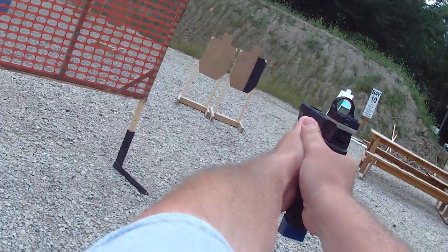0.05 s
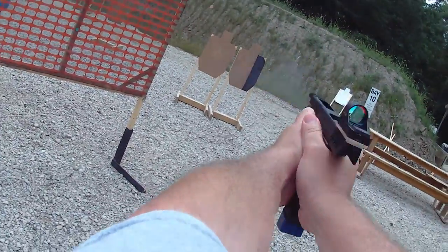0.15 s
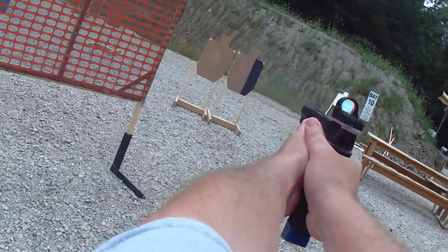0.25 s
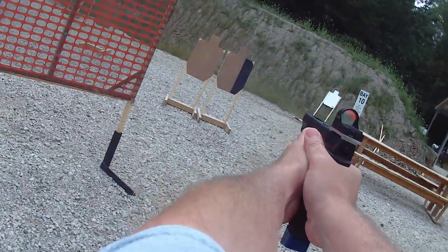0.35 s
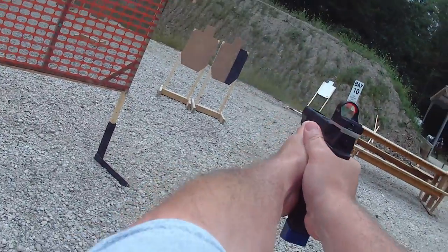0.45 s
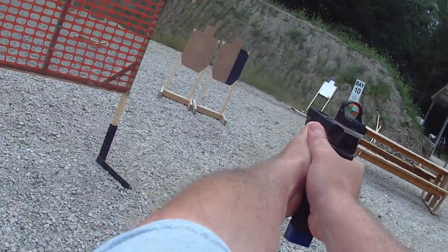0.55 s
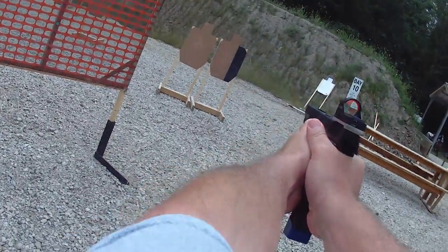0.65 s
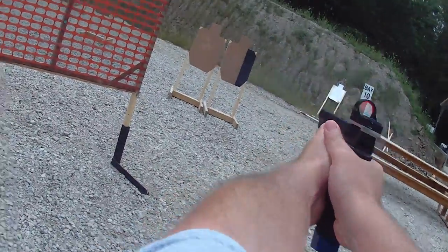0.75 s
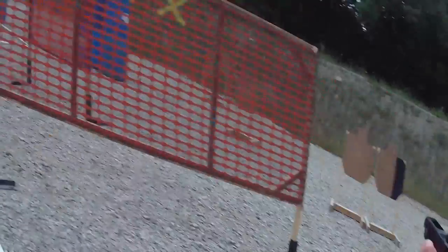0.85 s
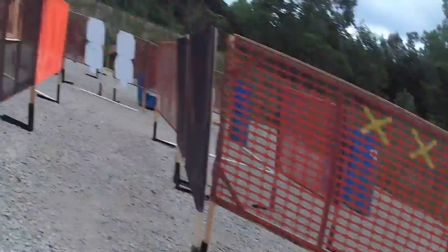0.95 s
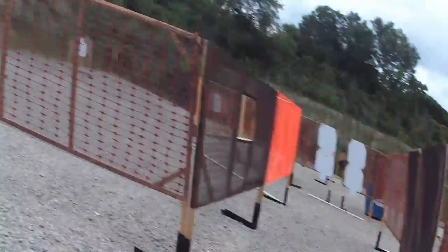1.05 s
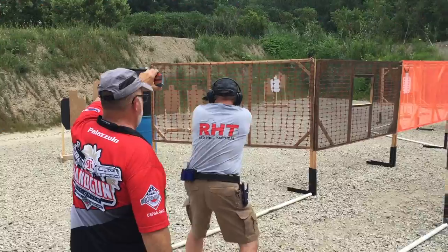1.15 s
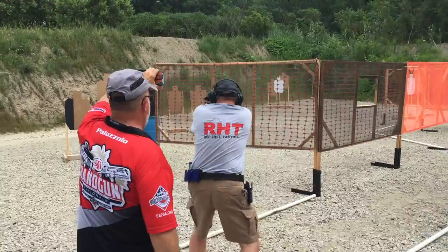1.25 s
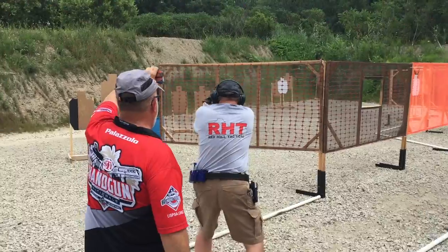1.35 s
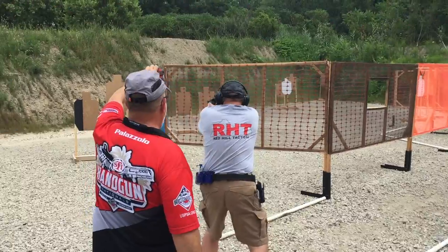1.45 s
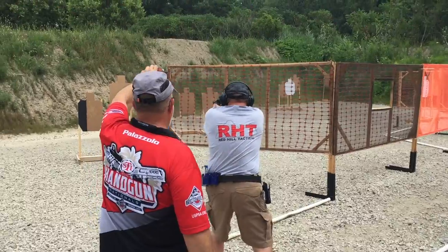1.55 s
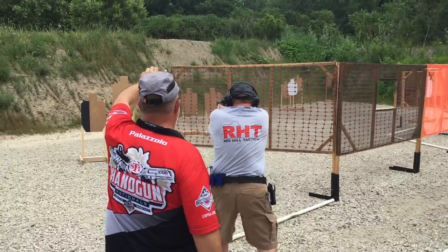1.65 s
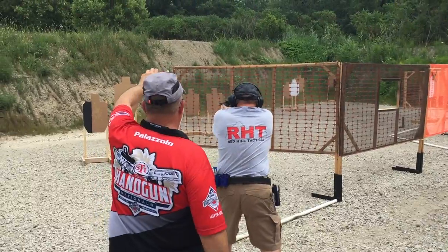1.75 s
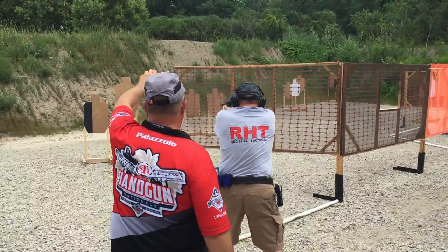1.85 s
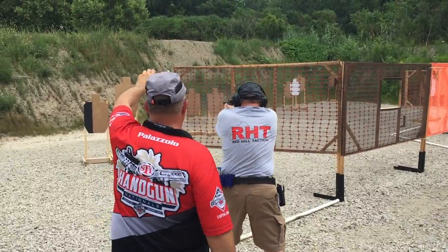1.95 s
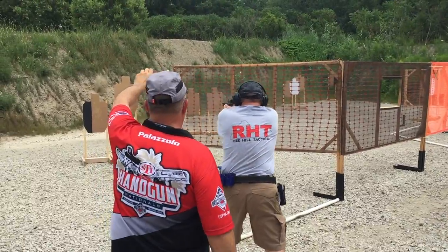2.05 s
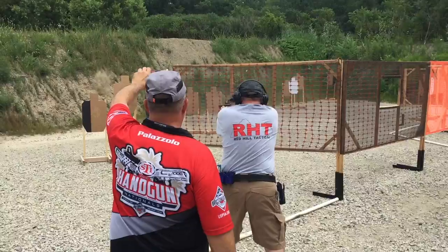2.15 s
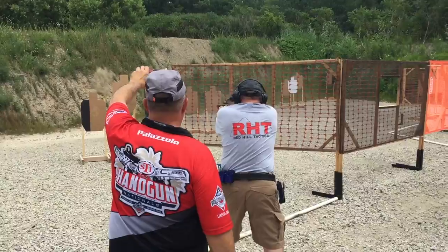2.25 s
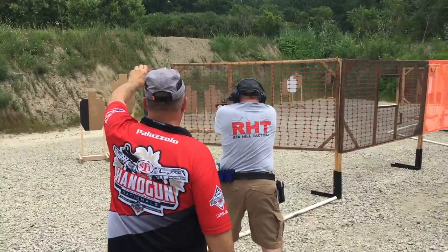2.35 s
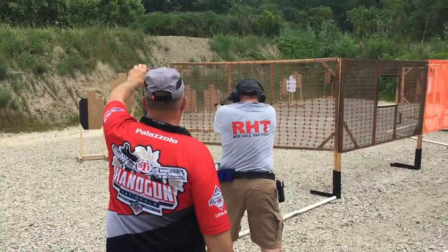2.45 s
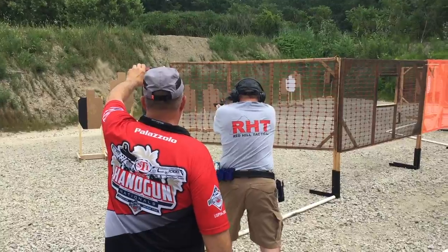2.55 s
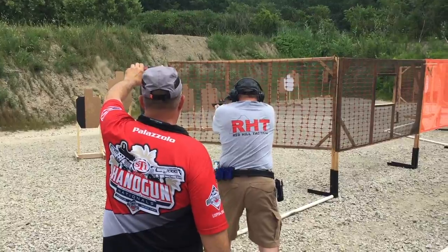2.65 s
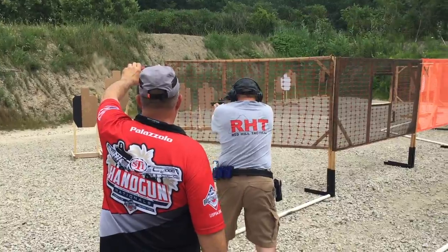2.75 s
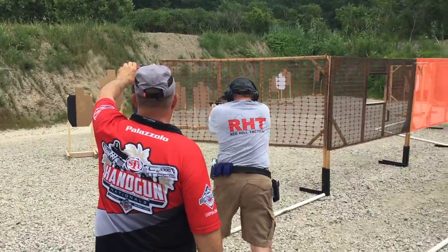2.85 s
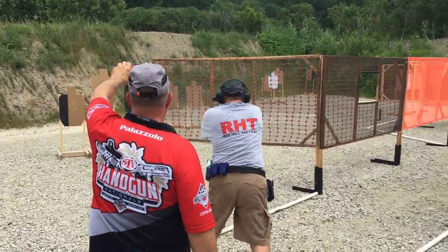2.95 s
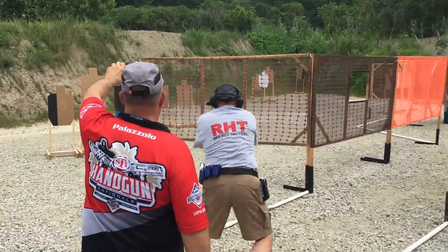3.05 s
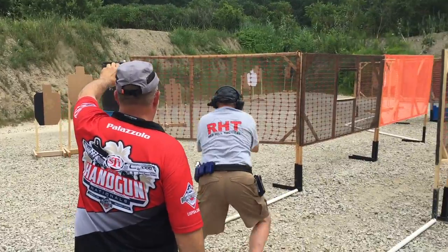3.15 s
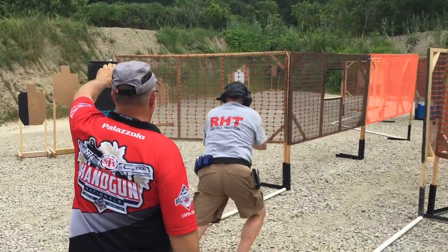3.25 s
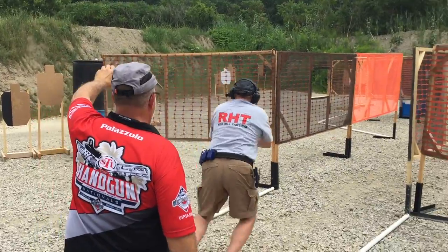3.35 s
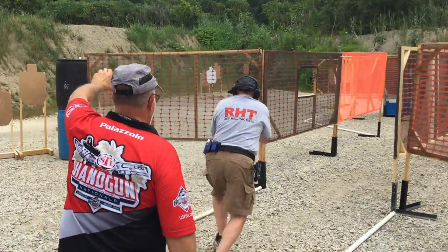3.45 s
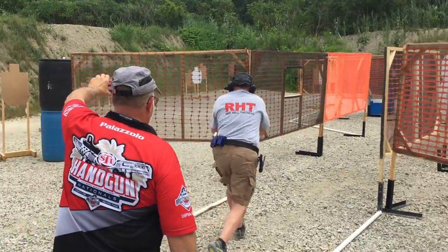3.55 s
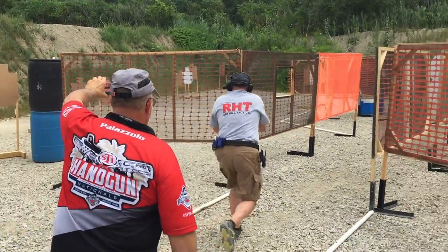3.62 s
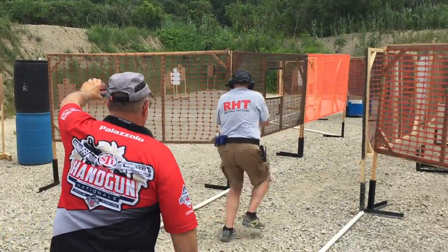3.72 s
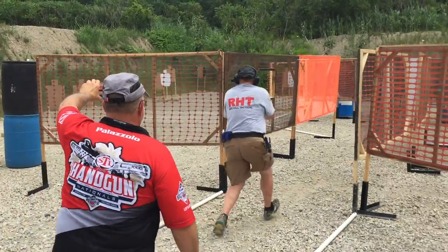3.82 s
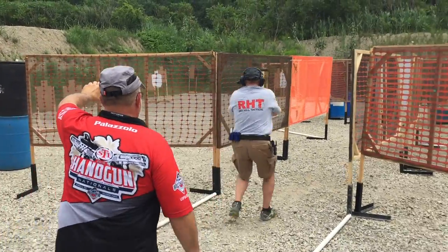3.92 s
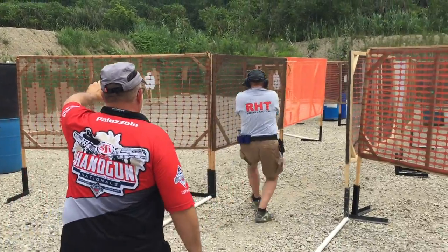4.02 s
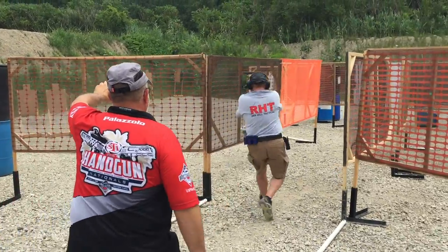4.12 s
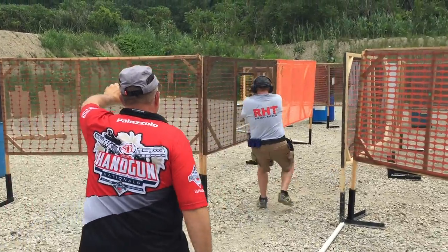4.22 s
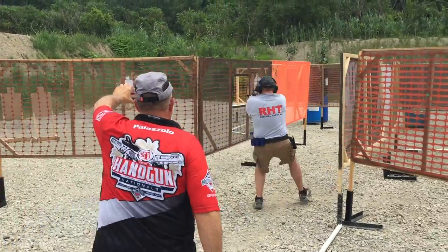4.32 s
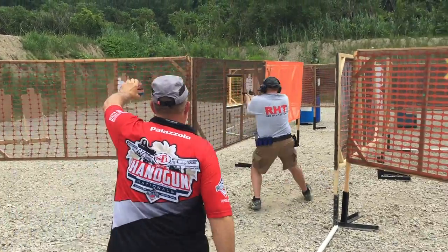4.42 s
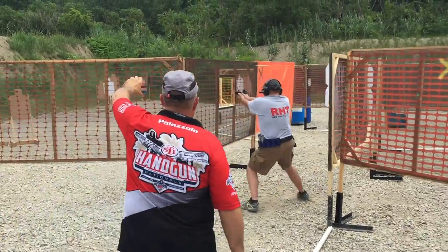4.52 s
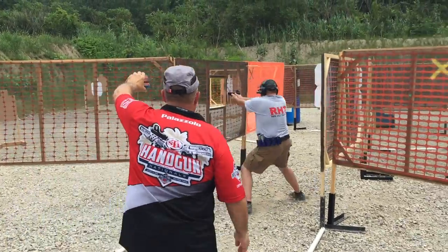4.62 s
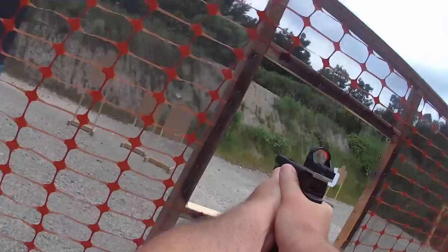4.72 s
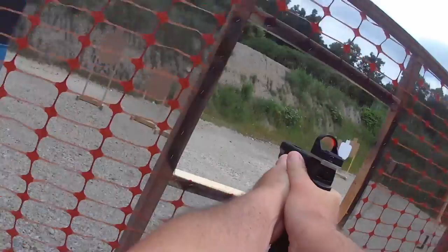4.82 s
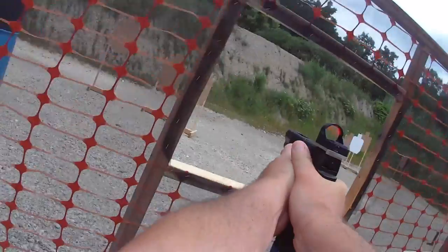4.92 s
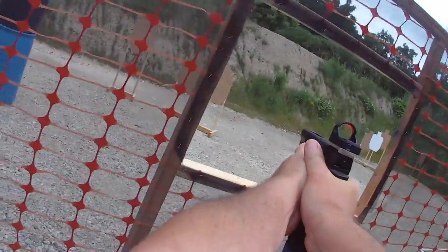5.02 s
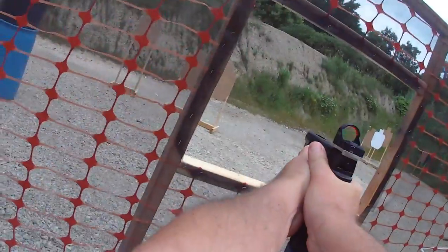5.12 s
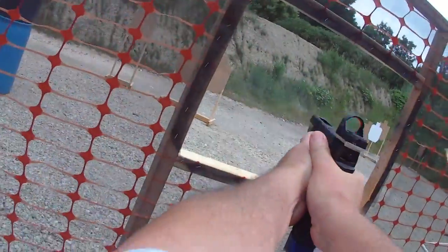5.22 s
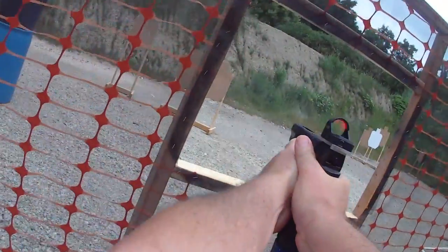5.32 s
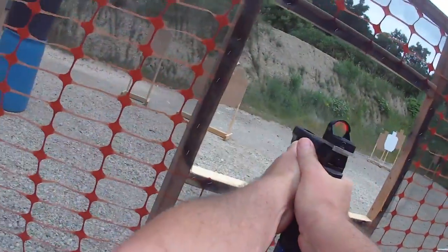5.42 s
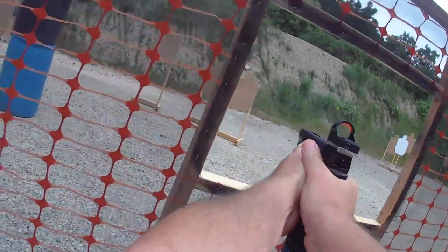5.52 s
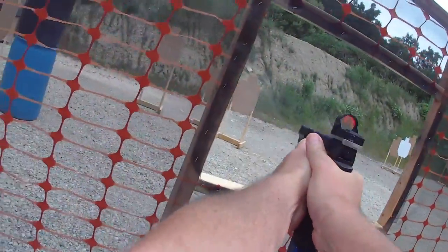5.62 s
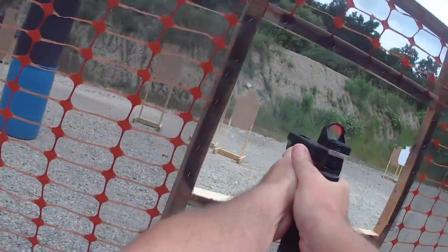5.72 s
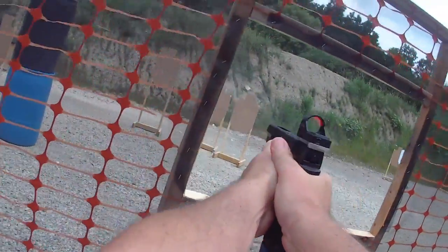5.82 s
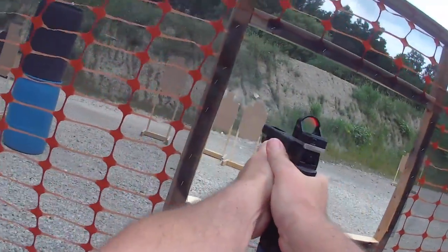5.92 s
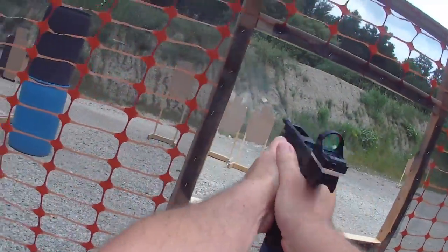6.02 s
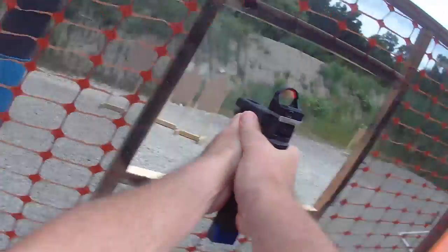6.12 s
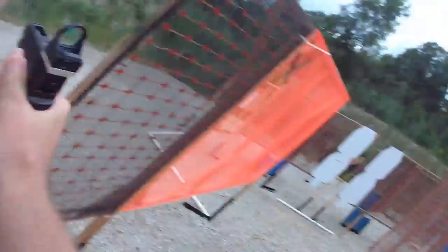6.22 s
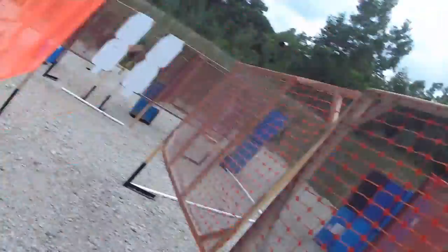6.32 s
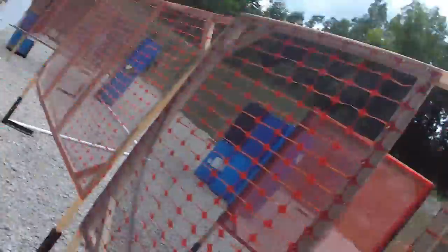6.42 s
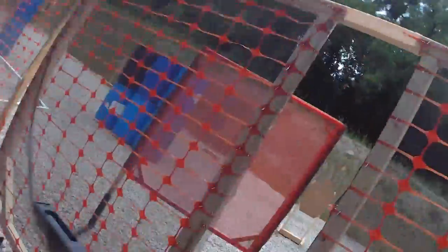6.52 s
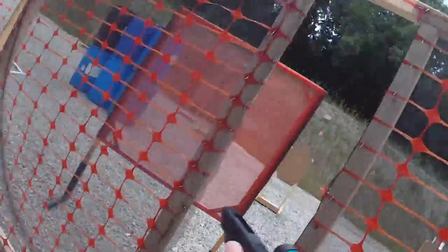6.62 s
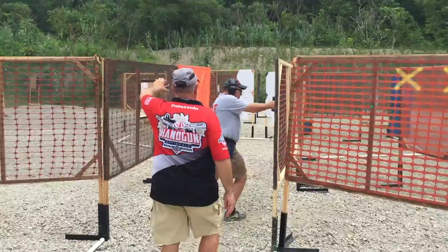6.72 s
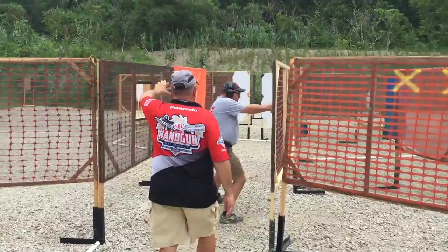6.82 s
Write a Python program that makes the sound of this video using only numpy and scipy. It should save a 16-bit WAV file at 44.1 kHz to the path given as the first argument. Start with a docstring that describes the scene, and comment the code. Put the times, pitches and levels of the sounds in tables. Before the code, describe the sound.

Outdoors in a gravel bay below a wooded hill, quiet air carries the fading echo of an earlier shot. At 0.14 and 0.66 seconds two close pistol shots crack, each overloading the microphone, with hard slaps, a short bay tail and a longer hill echo; a bullet knocks at 0.75. A spent case rings very high at 1.54, again fainter at 1.75. Heavier, boomier shots hit at 1.97 and 2.77, each followed by a dry knock. From 3.25 to 4.7 faint gravel scuffs accompany movement, and two softer shots, a pop and low thump heard from metres behind, come at 3.75 and 4.13 with rolling echoes. Small stone knocks and crunches follow around 4.6 to 5.0. Three close blasts at 5.19, 5.56 and 6.02 slap off surfaces; a bright knock follows at 6.09. The sound dips after blasts and recovers; brass tinkles at 6.81 in the decaying echo.

```python
"""Pistol pairs in a gravel bay

Seven close shots, heard at the shooter's head, are noise bursts that overload the microphone; slaps from walls
and ground, a bay tail and a long wooded-hill echo follow. Two more, a pop and thump, are heard from some metres
behind the shooter. Bullets and stones knock as resonant noise, spent cases ring as paired sines, and gravel
crunches in noise grains."""
import sys
import numpy as np
from scipy import signal
from scipy.fft import rfft, irfft
from scipy.io import wavfile
from scipy.ndimage import uniform_filter1d

SR = 44100
rng = np.random.default_rng(int(sys.argv[2]) if len(sys.argv) > 2 else 0)


def transcribe(signal):
    """Save signal, clipped to [-1, 1], as a 16-bit WAV file at the path in sys.argv[1]."""
    frames = np.atleast_2d(signal).T
    limited = np.clip(frames, -1, 1)
    pcm = np.round(limited * 32767).astype(np.int16)
    wavfile.write(sys.argv[1], SR, pcm)


N = 302967  # samples

# Spectrum of a soft body thud, under a close report and under a foot. Each row: frequency in Hz, level in dB.
BODY_COLOUR = [(20, -26), (55, -4), (110, 2.5), (160, -1.5), (230, 0), (380, -9.5), (1000, -44),
               (3000, -73.5)]
# Spectrum of the hill's answer, heard from behind the shooter. Each row: frequency in Hz, level in dB.
FAR_HILL_COLOUR = [(24, -52), (50, -16.5), (100, -12), (160, -27), (330, -9.5), (460, -13.5), (560, -1.5),
                   (700, -0.5), (900, -7), (1200, -5), (3000, -9), (4200, -13), (5500, -19.5),
                   (8500, -24.5), (16000, -46)]


def close_shots():
    """After a short reversed burst each report cracks, booms, slaps off surfaces, rings in the bay and echoes."""
    # Shots at the shooter's head. Each row: start in seconds, stance, then levels in dB of the blast, slaps,
    # shove, body, bay tail, reversed burst and hill echo. Surfaces below offset the slaps and shove.
    shots = [(0.1389, "open", 8.5, 3, -5, -15, -19, -2.5, -46),
             (0.6615, "open", -1, 2, -16.5, -33, -17.5, -13, -45),
             (1.9708, "fence", 9, 2.5, 0.5, -3, -13, -7.5, -46),
             (2.7747, "fence", 2, -1, -10, -9.5, -16.5, -16.5, -47),
             (5.1878, "window", 4.5, 6, 0, -8, -13.5, -4.5, -44),
             (5.5571, "window", -2.5, -1, -8, -15.5, -19.5, -20.5, -42.5),
             (6.0226, "window", -2, -1, -16.5, -18.5, -18.5, -21.5, -43.5)]
    # Walls and ground near each stance. Each row: delay in seconds, slap offset in dB, shove offset in dB.
    surfaces = {"open": [(0.012, -17, 0.5), (0.025, -11.5, -12), (0.062, -21.5, -39)],
                "fence": [(0.011, -8, 0.5), (0.028, -7.5, -2.5), (0.0505, -8.5, -9.5)],
                "window": [(0.0155, -18.5, -2), (0.0372, -6, -1.5)]}
    # The hill from each stance: round trip in seconds, factor on the echo's ring-down times.
    hill_from = {"open": (0.19, 0.75), "fence": (0.25, 0.85), "window": (0.25, 0.83)}
    # Spectra of the direct blast, slap, reversed burst, bay tail and hill echo.
    # Each row: frequency in Hz, level in dB.
    blast_colour = [(30, -31.5), (130, -3), (250, 3), (400, -13.5), (540, 6.5), (900, 0.5), (1500, -10),
                    (3000, -11.5), (5000, -15), (9000, -19), (16000, -26)]
    slap_colour = [(30, -28.5), (150, -7), (350, -9.5), (550, 8.5), (1000, -0.5), (1400, -4), (2800, -10),
                   (5000, -16.5), (7000, -17), (10000, -24.5), (16000, -28)]
    reversed_colour = [(40, -6), (250, -7.5), (550, -5), (900, -3.5), (1400, -38), (3000, -29),
                       (4500, -58.5), (9000, -76)]
    bay_colour = [(30, -16.5), (120, -6.5), (330, -4.5), (600, -2.5), (1200, 1.5), (2500, -3), (4500, -11),
                  (7000, -15), (10000, -19.5), (16000, -22.5)]
    hill_colour = [(24, -71.5), (100, -25), (180, -27.5), (340, -10.5), (580, -6), (1000, -2.5), (1600, -4),
                   (2700, -2.5), (4000, -8), (8800, -19.5), (16000, -28)]
    # Ring-down of the bay, and of the hill before the stance's factor. Each row: frequency in Hz, t60 in seconds.
    bay_t60 = [(60, 0.42), (500, 0.29), (2500, 0.33), (6000, 0.42), (15000, 0.36)]
    hill_t60 = [(60, 1.7), (600, 8.3), (2500, 3.1), (6000, 2.11), (14000, 0.76)]
    # the click's level is relative to the reversed burst
    click_lead_s, click_db, click_hz, click_t60_s = 0.02, -27, 2230, 0.07
    shove_lag_s, shove_hz, shove_t60_s = 0.0038, 61.8, 0.06

    out = np.zeros(N)
    for s, stance, blast_db, slaps_db, shove_db, body_db, tail_db, reversed_db, echo_db in shots:
        # the action clicks just ahead of the report
        click = knock(reversed_db + click_db, click_hz, click_t60_s)
        add(out, s - click_lead_s, click)

        # a short reversed noise burst ends where the report starts
        reversed_burst = burst(reversed_colour, reversed_db, t60=0.037, size=2048)[::-1]
        reversed_burst = low_cut(reversed_burst, hz=149)
        add(out, s - len(reversed_burst) / SR, reversed_burst)

        add(out, s, shocks(blast_colour, blast_db, t60=0.037))
        add(out, s + 0.006, burst(BODY_COLOUR, body_db, t60=0.16))

        # each reflected front also shoves the microphone into a low swing
        for delay, slap_db, push_db in surfaces[stance]:
            add(out, s + delay, shocks(slap_colour, slaps_db + slap_db, t60=0.044))
            shove = swing(shove_db + push_db, shove_hz, shove_t60_s)
            add(out, s + delay + shove_lag_s, shove)

        bay = scatter(bay_colour, bay_t60, patchy_db=2.5, flutter_db=1.0, frames=60)
        add(out, s, amp(tail_db) * low_cut(bay, hz=120))

        round_trip, length = hill_from[stance]
        echo = hill_echo(hill_colour, hill_t60, round_trip, spread=0.026, early_db=-9, length=length)
        add(out, s, amp(echo_db) * echo)
    return out


def far_shots():
    """From behind, a shot is a short noise pop and a low thump, followed by a broad rolling echo."""
    # Shots heard from some metres behind the shooter. Each row: start in seconds, then levels in dB of the
    # crack, thump, bay tail and hill echo. The thump's level is that of the swing before its weighted copies.
    shots = [(3.746, -27.5, -13, -37.5, -26.5), (4.1336, -23, -14, -35, -26)]
    # Spectra of the crack and of the bay tail. Each row: frequency in Hz, level in dB.
    crack_colour = [(30, -28), (200, -16), (700, 4), (1500, -8.5), (3200, -19), (4500, -30), (8000, -26),
                    (16000, -53)]
    bay_colour = [(20, -41), (60, -3), (150, 1.5), (300, -9.5), (600, -20), (1000, -7.5), (2500, -8.5),
                  (8000, -25), (16000, -35)]
    # Ring-down of the hill from here. Each row: frequency in Hz, t60 in seconds.
    hill_t60 = [(60, 2.1), (600, 1.69), (1500, 1.61), (3000, 1.29), (6000, 1.05), (14000, 0.63)]

    out = np.zeros(N)
    for s, crack_db, thump_db, tail_db, echo_db in shots:
        add(out, s, burst(crack_colour, crack_db, t60=0.066))

        # the push comes first, then the deeper suction
        thump = swing(thump_db, hz=152, t60=0.035)
        add(out, s + 0.003, -0.55 * thump)
        add(out, s + 0.0063, 0.42 * thump)

        add(out, s, burst(bay_colour, tail_db, t60=1.0, size=32768))
        echo = hill_echo(FAR_HILL_COLOUR, hill_t60, delay=0.12, spread=0.015, early_db=-19.5)
        add(out, s, amp(echo_db) * echo)
    return out


def knocks():
    """Bullets and stones land with the same dry, quickly dying knock."""
    # Sharp knocks of bullets landing and stones clacking. Each row: start in seconds, level in dB, centre in Hz.
    landings = [(0.7531, -13, 2330), (2.069, -17, 1080), (2.8713, -17.5, 1038), (3.597, -39, 2300),
                (4.660, -33.5, 6150), (4.811, -31.5, 2070), (6.0902, -19, 5500)]
    out = np.zeros(N)
    for s, db, hz in landings:
        add(out, s, knock(db, hz, t60=0.011))
    return out


def cases():
    """A brass case ticks on a stone and rings on a close pair of high modes, so the note beats."""
    # Spent cases striking stones. Each row: start in seconds, ring level in dB, lower mode in Hz, t60 in seconds.
    strikes = [(1.54, -30.5, 12060, 0.057), (1.745, -43.5, 12020, 0.31), (3.45, -64, 11320, 0.19),
               (3.53, -66, 12130, 0.37), (5.031, -55, 11700, 0.18), (5.11, -62, 12200, 0.28),
               (6.809, -48.5, 12100, 0.14)]
    # tick and lingering ring are set relative to the ring
    tick_db, tick_hz, tick_t60_s = -11, 4470, 0.012
    linger_db, linger_t60_s = -24.5, 0.7

    out, t = np.zeros(N), clock(0.43)
    for s, db, hz, t60 in strikes:
        lower = np.sin(2 * np.pi * hz * t)
        upper = 0.39 * np.sin(2 * np.pi * (hz + 55) * t)
        fade = dying(t, t60) + amp(linger_db) * dying(t, linger_t60_s)
        onset = 1 - np.exp(-t / 0.0019)
        add(out, s, amp(db) * (lower + upper) * fade * onset)
        add(out, s, knock(db + tick_db, tick_hz, tick_t60_s))
    return out


def gravel(count=10):
    """Steps on gravel at set times, with further scuffs loosely spaced while the shooter moves on."""
    # Steps on gravel. Each row: start in seconds, level in dB, length of the press in seconds.
    steps = [(1.728, -59, 0.048), (3.647, -59.5, 0.15), (4.612, -51.5, 0.095), (4.759, -61, 0.089),
             (4.975, -54.5, .15), (5.712, -51.5, 0.041)]
    move_from_s, move_to_s = 3.25, 4.7

    out = np.zeros(N)
    for s, db, length in steps:
        add(out, s, footfall(db, length))
    # one scuff at a random place in each equal share of the move
    for share in (np.arange(count) + rng.random(count)) / count:
        s = move_from_s + share * (move_to_s - move_from_s)
        add(out, s, footfall(db=-59, length=0.065))
    return out


def footfall(db, length, grains_per_s=500, spread_db=2.5, size=8192):
    """A foot presses many small stones together over a soft thud."""
    # Spectrum of stone on stone. Each row: frequency in Hz, level in dB.
    stone_colour = [(100, -1), (800, 7), (2000, -3), (4000, -7), (7000, -3.5), (10000, -7), (16000, -11.5)]
    t = np.arange(size) / SR
    press = np.sin(np.pi * np.minimum(t / length, 1))
    hits = rng.random(size) < grains_per_s / SR
    strengths = amp(spread_db * np.minimum(rng.exponential(1, size), 4))
    grains = signal.fftconvolve(hits * strengths, dying(t, t60=0.018))[:size]
    crunch = tint(grains * rng.standard_normal(size), stone_colour)
    thud = noise(BODY_COLOUR, size)
    return amp(db) * press * (crunch + thud)


def earlier_echo():
    """The echo of a previous shot, rolling away for a moment at the start."""
    return burst(FAR_HILL_COLOUR, db=-35.5, t60=1.0)


def outdoor_air():
    """Steady, quiet noise of the open air."""
    # Spectrum of the air. Each row: frequency in Hz, level in dB.
    air_colour = [(20, -42), (60, -10.5), (110, -17.5), (300, -11.5), (570, 0), (1100, -3.5), (1500, -14.5),
                  (2400, -12), (4500, -26), (8000, -35), (16000, -54)]
    return amp(-56.5) * noise(air_colour, N)


def hill_echo(colour, t60s, delay, spread, early_db, length=1):
    """The wooded slope answers: a little comes early, the bulk after the round trip."""
    t60s = [(hz, t60 * length) for hz, t60 in t60s]
    echo = scatter(colour, t60s, patchy_db=2.0, flutter_db=-0.5, frames=300, delay=delay)
    t = np.arange(len(echo)) / SR
    arrival = (1 + np.tanh((t - delay) / spread)) / 2
    return low_cut(echo, hz=85) * (arrival + amp(early_db) * (1 - arrival))


def scatter(colour, t60s, patchy_db, flutter_db, frames, delay=0):
    """Sound scattered by many surfaces: patchy noise whose bands die at their own speed after the delay."""
    size, hop = 512, 256  # samples
    hz = np.fft.rfftfreq(size, 1 / SR)
    t = np.arange(frames)[:, None] * hop / SR
    re, im, patches = rng.standard_normal((3, frames, len(hz)))
    # smooth over frequency, then over time
    patches = uniform_filter1d(patches, size=14, axis=1)
    patches = uniform_filter1d(patches, size=3, axis=0)
    flutter = uniform_filter1d(rng.standard_normal(frames), size=2)[:, None]
    level_db = read(colour, hz) + patchy_db * patches / patches.std() + flutter_db * flutter
    spectra = (re + 1j * im) * amp(level_db)
    fade = dying(np.maximum(t - delay, 0), read(t60s, hz))
    window = np.sin(np.pi * np.arange(size) / size)
    grains = irfft(spectra * fade) * window
    overlapped = grains[:-1, hop:] + grains[1:, :hop]
    return overlapped.ravel() / irfft(spectra).std()  # scaled by the sound before its fade


def shocks(colour, db, t60, ragged_db=4.0, bounce=0.49, size=4096):
    """A pressure front with many small reflections: a ragged burst, combed by bounces off things close by."""
    lumps = uniform_filter1d(rng.standard_normal(size), size=60)
    fronts = rng.standard_normal(size) * amp(ragged_db * lumps / lumps.std())
    for lag in rng.integers([15, 60], [50, 150]):  # one short and one longer lag, in samples
        fronts = fronts + bounce * np.roll(fronts, lag)
    return amp(db) * tint(fronts, colour) * dying(np.arange(size) / SR, t60)


def swing(db, hz, t60):
    """A push of air that swings out as a damped low wave."""
    t = clock(0.2)
    return -amp(db) * np.sin(2 * np.pi * hz * t) * dying(t, t60)


def knock(db, hz, t60):
    """A short burst through one broad resonance."""
    # Shape of the resonance. Each row: multiple of the centre frequency, level in dB.
    resonance = [(.05, -30), (.5, -15), (.85, -4.5), (1.1, -10), (1.6, -17.5), (3, -25), (14, -41.5)]
    colour = [(multiple * hz, level) for multiple, level in resonance]
    return burst(colour, db, t60, size=4096)


def burst(colour, db, t60, size=8192):
    """A sudden puff of noise that dies away."""
    return amp(db) * noise(colour, size) * dying(np.arange(size) / SR, t60)


def noise(colour, size):
    """Noise of rms 1 with the given spectrum."""
    return tint(rng.standard_normal(size), colour)


def tint(x, colour):
    """Weights the spectrum of x by a colour and brings it to rms 1."""
    hz = np.fft.rfftfreq(len(x), 1 / SR)
    y = irfft(rfft(x) * amp(read(colour, hz)), len(x))
    return y / y.std()


def low_cut(x, hz):
    """Takes out the bass below hz with a second-order high-pass."""
    return signal.sosfilt(signal.butter(2, hz, "highpass", fs=SR, output="sos"), x)


def dying(t, t60):
    """Gain that falls 60 dB in t60 seconds."""
    return np.exp(-np.log(1000) * t / np.maximum(t60, 1e-3))


def amp(db):
    """Decibels to gain."""
    return 10 ** (np.asarray(db) / 20)


def read(points, hz):
    """A table of (Hz, value), joined on a log-frequency axis."""
    f, value = np.transpose(points)
    return np.interp(np.log(hz + 1), np.log(f + 1), value)


def clock(seconds):
    """Sample times from zero."""
    return np.arange(int(seconds * SR)) / SR


def add(mix, s, sound):
    """Lays a sound into the mix at time s, trimmed to fit."""
    start = round(s * SR)
    sound = sound[max(-start, 0):]
    part = mix[max(start, 0):][:len(sound)]
    part += sound[:len(part)]


def scene():
    """All sources over the quiet outdoor air, ahead of the microphone's overload."""
    out = close_shots() + far_shots() + knocks() + cases() + gravel() + outdoor_air()
    add(out, 0, earlier_echo())
    return low_cut(out, hz=27.5)[None]


def record(dry, ceiling=0.27, duck_db=9, duck_s=0.31):
    """The microphone overloads; gain control sinks after each overload and recovers; then the band limit."""
    sound = dry[0]
    clipped = sound / (1 + np.square(sound / ceiling) ** 4) ** (1 / 8)

    # the duck deepens with the time spent over the ceiling, through a smooth rise and fall
    lag = np.sin(np.pi * np.minimum(clock(0.5) / duck_s, 1)) ** 2
    overloaded = 1.0 * (abs(sound) > ceiling)
    overload_s = signal.oaconvolve(overloaded, lag)[:N] / SR
    ducked = clipped * amp(-duck_db * np.tanh(overload_s / 0.033))

    band_limit = signal.firwin(255, 16000, window=("kaiser", 9), fs=SR)  # low-pass at 16 kHz
    return signal.oaconvolve(ducked, band_limit, "same")[None]


dry = scene()
out = record(dry)
transcribe(out)
```